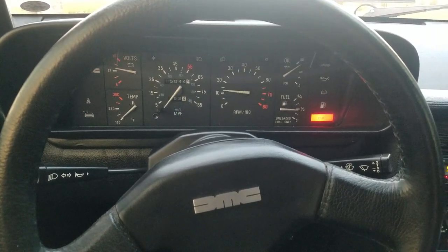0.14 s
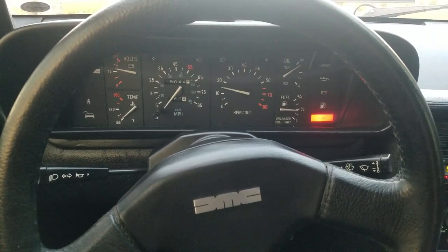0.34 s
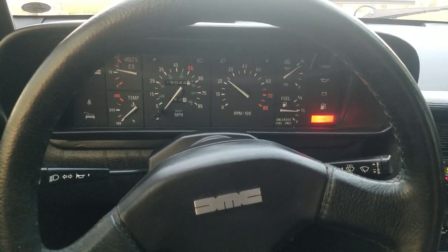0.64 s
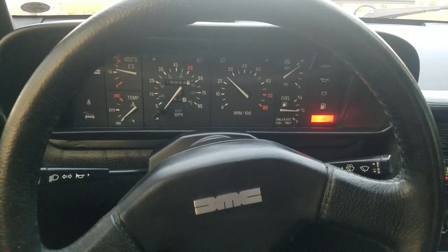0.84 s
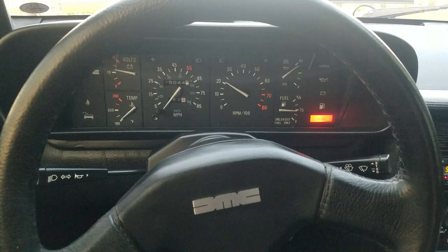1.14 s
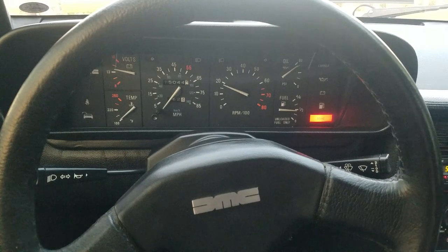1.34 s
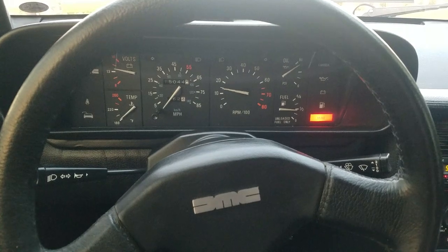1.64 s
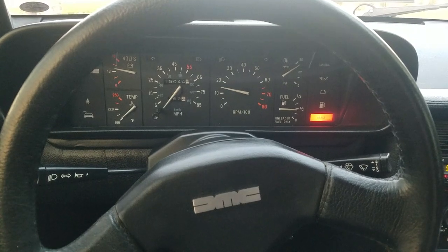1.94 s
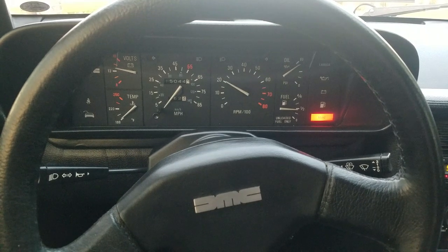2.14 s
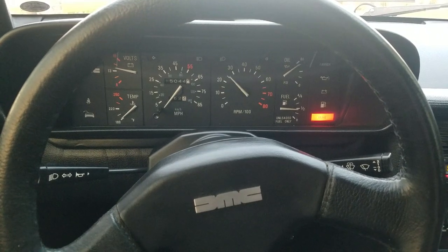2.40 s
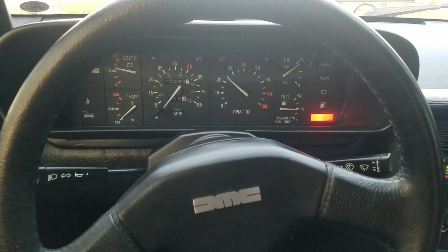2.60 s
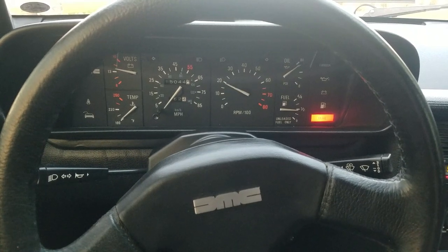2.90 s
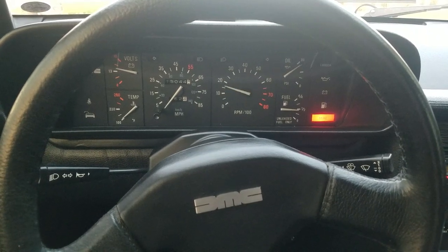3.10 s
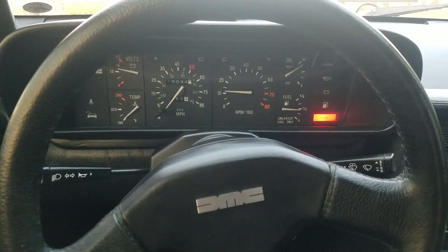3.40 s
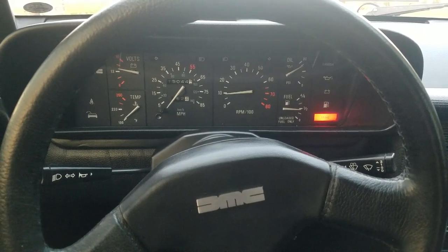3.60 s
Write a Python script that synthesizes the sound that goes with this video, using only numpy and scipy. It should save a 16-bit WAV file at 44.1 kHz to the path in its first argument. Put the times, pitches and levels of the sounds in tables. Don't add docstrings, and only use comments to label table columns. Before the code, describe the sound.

A petrol car engine, heard from the driver's seat of a parked car, idles softly and unevenly, then rises from about 0.1 s to a booming peak near 0.7 s and sinks by 1.6 s. A second rev climbs from 1.7 s, peaks around 2.3 s and falls to idle after 3 s. Pedal clacks mark 0.65 and 2.25 s, the latter doubled. Panels drone, valve gear rustles, and faint pump whine, hiss and trim creaks lie beneath.

```python
import sys
import numpy as np
from scipy import signal
from scipy.fft import rfft, irfft, next_fast_len
from scipy.io import wavfile
from scipy.ndimage import map_coordinates

SR = 44100
rng = np.random.default_rng(int(sys.argv[2]) if len(sys.argv) > 2 else 0)


def rack_gain(trim_db):
    fader = np.asarray(trim_db, float)
    return 10 ** (fader / 20)


def int16_out(signal):
    q = np.round(np.clip(np.atleast_2d(signal).T, -1, 1) * 32767)
    wavfile.write(sys.argv[1], SR, q.astype(np.int16))


N = 165375
TIME = np.arange(N) / SR
MID_RATE_HZ = 47.5

# (throttle opens [s], lifts [s], idle control returns [s])
BLIPS = [
    (.12, 0.649, 1.434),
    (1.716, 2.262, 2.97),
]
# (frequency [Hz], left-right likeness [-1 to 1])
CABIN_ALIKE = [(60, 0.92), (180, 0.73), (550, 0.75), (1650, -0.048), (4970, -0.023), (15000, -1.1)]


def unit(x):
    return x / np.sqrt(np.mean(x ** 2) + 1e-20)


def along(points, hz):
    f, v = np.transpose(points)
    return np.interp(np.log(hz + 1), np.log(f + 1), v)


def colour(points):
    return lambda hz: rack_gain(along(points, hz))


def wobble(rate):
    knots = rng.standard_normal(int(N * rate / SR) + 4)
    return map_coordinates(knots, [np.arange(N) * rate / SR])


def filtered(x, response):
    m = next_fast_len(N + SR // 2)
    return irfft(rfft(x, m) * response(np.fft.rfftfreq(m, 1 / SR)), m)[..., :N]


def resonances(peaks, f):
    total = 0
    for k, (centre, width, db) in enumerate(peaks):
        damping = 1j * f * width
        total = total + (-1) ** k * rack_gain(db) * damping / (centre * centre - f * f + damping)
    return total


def pair(response, alike, lead=None):
    def mid_side(hz):
        turn = np.arccos(np.clip(along(alike, hz), -1, 1)) / 2
        return response(hz) * [np.cos(turn), np.sin(turn)]

    mid, side = filtered(rng.standard_normal((2, N)), mid_side)
    both = np.array([mid + side, mid - side])
    if lead:
        both = filtered(both, lambda hz: np.exp([.5j * lead(hz), -.5j * lead(hz)]))
    return unit(both)


def blip_state():
    step = lambda s: np.tanh((TIME - s) / 0.025) / 2
    idle = 1 - sum(step(opens) - step(returns) for opens, lifts, returns in BLIPS)
    overrun = sum(step(lifts) - step(returns) for opens, lifts, returns in BLIPS)
    return idle, overrun


def engine_controls():
    # (time [s], firing-pair rate [Hz], single-firing order level [dB], pair order level [dB])
    engine = [(0.0, 32.2, -14, -33), (0.12, 30.43, -32, -59), (0.22, 34.86, -27.5, -37.5),
              (0.38, 49.8, -12, -25), (0.49, 56.86, -14.5, -20.5), (0.69, 67.4, -19, -28),
              (0.79, 65.65, -22, -24.5), (1.15, 50.88, -24, -22.5), (1.62, 32.73, -30.5, -43),
              (1.72, 31.52, -31, -36), (1.83, 35.62, -27, -27.5), (1.97, 49.54, -12.5, -28.5),
              (2.09, 57.6, -15, -19.5), (2.29, 67.7, -20.5, -25.5), (2.39, 67.43, -22.5, -23.5),
              (2.81, 50.04, -23, -22.5), (3.21, 34.4, -26.5, -27), (3.75, 27.85, -16, -42)]
    s, *columns = np.transpose(engine)
    return [np.interp(TIME, s, column) for column in columns]


def rumble():
    deep = filtered(rng.standard_normal(N), lambda f: 1 / (1 + (f / 30) ** 4))
    return rack_gain(-35) * unit(deep)


def far_hiss(octaves):
    # (frequency [Hz], level [dB per Hz])
    hiss_colour = [(2940, -26), (5000, 1.5), (6760, -5.5), (11700, -6.5), (12700, -11), (15100, -7),
                   (16000, -11)]
    # (frequency [Hz], left-right likeness [-1 to 1])
    hiss_alike = [(5000, .05), (15000, .1)]
    level_db = -63.5 + 4 * octaves + 1.0 * wobble(5)
    return rack_gain(level_db) * pair(colour(hiss_colour), hiss_alike)


def fuel_pump(octaves):
    # (frequency [Hz], width [Hz], level [dB])
    whines = [(1090, 35, -60), (1803, 9, -61), (2710, 30, -64)]
    # (time [s], rise [dB])
    flares = [
        (.1, 2),
        (.95, 9),
        (3.08, 3),
        (3.45, 4),
        (3.65, 7),
    ]
    flare_db = sum(db * np.exp(-((TIME - s) / 0.098) ** 2) for s, db in flares)
    lines = []
    for centre, width, db in whines:
        line = pair(lambda f: resonances([(centre, width, 0)], f) ** 2, CABIN_ALIKE)
        lines.append(rack_gain(db + 2 * wobble(6)) * line)
    return rack_gain(-3 * octaves) * (lines[0] + rack_gain(flare_db) * lines[1] + lines[2])


def trim_creaks():
    # (time [s], centre [Hz], width [Hz], length [s], level [dB])
    creaks = [
        (.12, 14000, 2970, 0.019, -69),
        (.24, 10200, 508, 0.054, -69),
        (.47, 13600, 3070, 0.011, -68),
        (1.15, 9916, 900, 0.041, -69),
        (1.58, 10100, 502, 0.044, -67.5),
        (1.76, 14000, 2920, 0.028, -68),
        (2.93, 11850, 700, .06, -71),
        (3.35, 10660, 3480, .025, -65),
    ]
    out = np.zeros((2, N))
    t = np.arange(-4096, 4096) / SR
    f = np.fft.rfftfreq(len(t), 1 / SR)
    for s, hz, width, length, db in creaks:
        spectrum = rfft(rng.standard_normal((2, len(t)))) * np.exp(-((f - hz) / width) ** 2)
        band = unit(irfft(spectrum))
        start = round(s * SR) - len(t) // 2
        out[:, start:][:, :len(t)] += rack_gain(db) * np.exp(-(t / length) ** 2) * band
    return out


def pedal_clacks():
    # (time [s], peak level [dB])
    clacks = [
        (.6525, -17),
        (2.252, -14),
        (2.272, -16.5),
    ]
    # (frequency [Hz], level [dB per Hz])
    stop_colour = [(350, -40.5), (600, -6), (1290, -6), (1640, -7), (2210, -5.5), (4110, -15), (7110, -30),
                   (9890, -25.5), (16000, -34.5)]
    # (frequency [Hz], width [Hz], level [dB])
    lever_peaks = [(910, 40, 0), (1280, 80, -5), (2170, 30, -1), (2900, 60, -8), (4100, 60, -12),
                   (8040, 90, -22), (9810, 90, -22)]
    # (frequency [Hz], left-right likeness [-1 to 1])
    clack_alike = [(600, 0.34), (2000, 0.48), (12000, 0.27)]
    # (frequency [Hz], phase lead of the left [radians], negative for a lag)
    left_lead = [(700, 0), (2150, -3.6), (4390, -4), (6200, -8.7), (9470, -15.4), (14800, -28.7)]
    lever = [(centre, width + 40, db) for centre, width, db in lever_peaks]
    out = 0
    for s, db in clacks:
        since = np.clip(TIME - s, 0, None)
        rise = 1 - np.exp(-(since / .0025) ** 2)
        decay = np.exp(-since / .0075) + rack_gain(-12) * np.exp(-since / .015)
        shape = rise * decay
        burst = lambda response: shape * pair(response, clack_alike, lambda f: along(left_lead, f))
        rattle = unit(burst(colour(stop_colour)))
        ring = unit(filtered(burst(lambda f: f > 600), lambda f: resonances(lever, f)))
        out = out + rack_gain(db - 4) * np.std(shape) * 2 * unit(rattle + rack_gain(-4) * ring)
    return out


def valve_gear(octaves, turns):
    # (frequency [Hz], level [dB per Hz])
    gear_colour = [(320, -24), (550, -4), (695, -23), (757, -10), (1590, -15), (2630, -16.5), (3150, -25),
                   (3900, -25.5), (7000, -46), (9100, -74), (15400, -120)]
    level_db = -42 + 5.5 * octaves + 0.46 * wobble(8)
    gate = 1 + 0.1 * np.cos(4 * np.pi * turns)
    return rack_gain(level_db) * gate * pair(colour(gear_colour), CABIN_ALIKE)


def panel_drone(octaves):
    # (frequency [Hz], level [dB per Hz])
    panel_colour = [(88, -37), (150, -8), (201, -3), (242, -22.5), (383, -14.5), (416, -15), (541, -24.5),
                    (900, -35), (1170, -59.5), (1980, -120)]
    pull_db = 2 * (1 - sum(blip_state()))
    level_db = -37 + pull_db + 2.5 * octaves + 0.62 * wobble(9.8)
    return rack_gain(level_db) * pair(colour(panel_colour), CABIN_ALIKE)


def uneven_burns(turns):
    cylinders = [0.37, 0.026, -0.38, -1.65, 0.19, 0.41]
    # (frequency [Hz], width [Hz], level [dB])
    cabin_modes = [(54.7, 22.3, -4.5), (99.9, 34.1, 0), (149.3, 23.8, -2.5), (210.6, 55, -12.5)]
    idle, overrun = blip_state()
    pull = 1 - idle - overrun
    level_db = idle * -28.5 + overrun * -30 + pull * -30
    whole = np.arange(1, int(turns[-1]))
    second = whole - 1 + 90 / 240
    when = np.column_stack([second, whole]).ravel()
    size = np.resize(cylinders, len(when)) + .55 * rng.standard_normal(len(when))
    blows = unit(np.bincount(np.searchsorted(turns, when), size, N))
    shaking = .8 * rng.standard_normal(N)
    cabin = lambda f: resonances(cabin_modes, f) / (1 + 1j * f / 260) ** 2
    return rack_gain(level_db) * unit(filtered(blows + shaking, cabin))


def order_tone(order, turns, db, waver_db):
    phase = 2 * np.pi * order * turns + 0.23 * order * wobble(9)
    return np.sqrt(2) * rack_gain(db + waver_db * wobble(14)) * np.sin(phase)


def overrun_whine(rate, turns):
    order, panel_hz, width_hz = 12.5, 556, 45
    panel = np.exp(-((order * rate - panel_hz) / width_hz) ** 2) * (np.gradient(rate) < 0)
    return panel * order_tone(order, turns, -42, waver_db=5.0)


def firing_orders(rate, turns, single_db, pair_db):
    # (multiple of pair rate, level [dB])
    upper_orders = [(3, -29), (4, -33), (5, -40), (6, -42.5)]
    # (frequency [Hz], gain [dB])
    order_path = [(60, -8.5), (95, 2.5), (125, -2), (150, -2), (175, -9.5), (200, -16.5), (250, -7.5),
                  (300, -17.5), (400, -9)]
    # (frequency [Hz], gain [dB])
    boom_path = [(85, 0), (96, -4.5), (104, 1.5), (116, 2)]
    idle, overrun = blip_state()
    pull = 1 - idle - overrun

    def reversal(lag):
        return np.prod([np.tanh((TIME - lifts - lag) / .04) for opens, lifts, returns in BLIPS], axis=0)

    boom_db = single_db + pull * along(boom_path, 2 * rate)
    single = reversal(.13) * order_tone(2, turns, boom_db, waver_db=0.9 + 1.5 * overrun)
    paired = reversal(.06) * order_tone(0.99, turns, pair_db, waver_db=0.5)
    upper = sum(order_tone(k, turns, db + along(order_path, k * rate), waver_db=2.5) for k, db in upper_orders)
    return rack_gain(-17 * idle) * (single + paired) + rack_gain(-11 * idle) * upper


def scene():
    rate, single_db, pair_db = engine_controls()
    turns = np.cumsum(rate) / SR
    octaves = np.log2(rate / MID_RATE_HZ)
    background = rumble() + far_hiss(octaves) + fuel_pump(octaves) + trim_creaks()
    near = pedal_clacks() + valve_gear(octaves, turns) + panel_drone(octaves)
    engine = uneven_burns(turns) + overrun_whine(rate, turns) + firing_orders(rate, turns, single_db, pair_db)
    return background + near + engine


def top_cut(x):
    return signal.sosfilt(signal.butter(12, 16660, fs=SR, output="sos"), x)


def record(dry):
    # (frequency [Hz], left over right [dB])
    port_tilt = [(60, -2.5), (180, -0.5), (550, -2.5), (1650, -1.0), (4970, -0.5), (15000, -2)]

    def ports(hz):
        half_db = along(port_tilt, hz) / 2
        low_cut = (1j * hz / (18 + 1j * hz)) ** 2
        return rack_gain([half_db, -half_db]) * low_cut * (hz < 15850)

    return top_cut(filtered(dry, ports))


dry = scene()
out = record(dry)
int16_out(out)
```